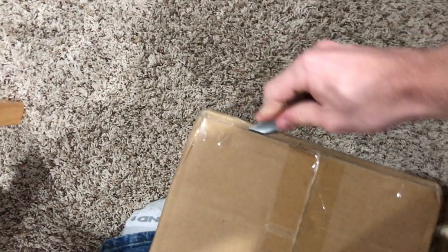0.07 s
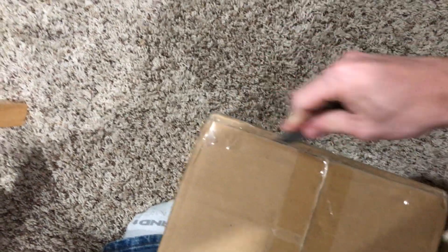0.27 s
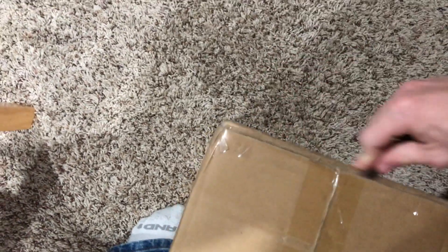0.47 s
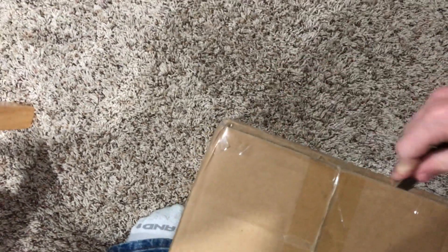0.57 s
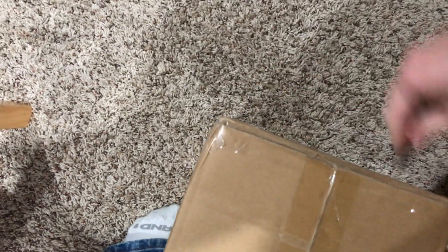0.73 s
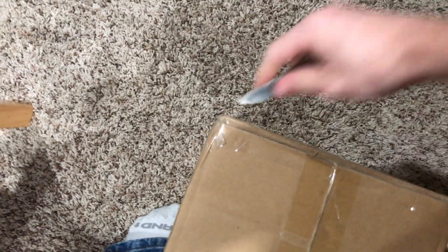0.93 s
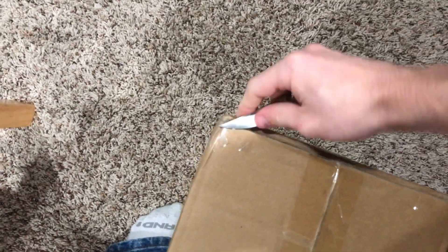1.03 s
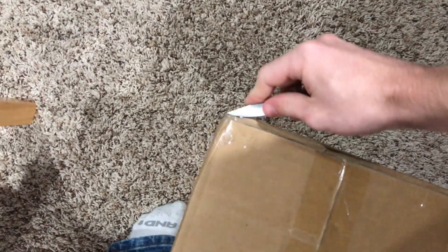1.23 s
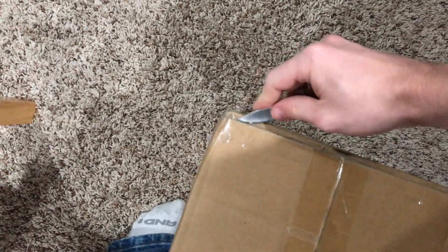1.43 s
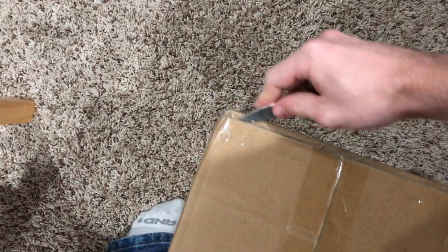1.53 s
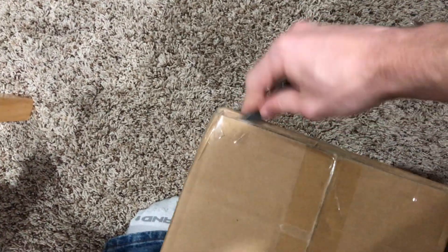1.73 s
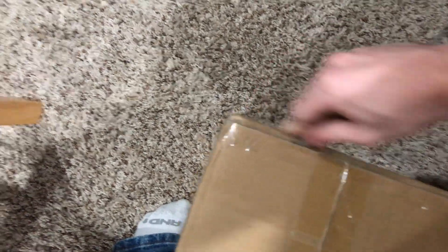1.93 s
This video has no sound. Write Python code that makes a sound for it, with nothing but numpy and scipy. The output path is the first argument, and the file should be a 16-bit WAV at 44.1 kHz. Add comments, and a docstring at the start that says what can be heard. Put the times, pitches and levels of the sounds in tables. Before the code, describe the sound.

A blade scrapes along a taped cardboard box in short rips with crisp snaps and hollow knocks, pauses with only faint ticks, then cuts again; close microphone in a quiet carpeted room.

```python
"""A blade scrapes along the taped seam of a cardboard box in a quiet carpeted room, close to the microphone.
Friction is fine random grit, and each push or knock excites the decaying modes of the hollow box.
Tape fibres rip as dense crackle in short bursts and snap as sharp cracks with a brief ring.
A faint diffuse room tail and a steady room tone lie beneath."""
import sys
import numpy as np
from scipy import signal
from scipy.fft import rfft, irfft
from scipy.io import wavfile

SR = 44100
rng = np.random.default_rng(int(sys.argv[2]) if len(sys.argv) > 2 else 0)


def file_out(sig):
    """Save sig as 16-bit WAV at sys.argv[1]."""
    # one column per channel
    cols = np.atleast_2d(sig).T
    # limit, then scale
    lim = np.clip(cols, -1, 1)
    pcm = np.round(lim * 32767).astype(np.int16)
    wavfile.write(sys.argv[1], SR, pcm)


def gain_from_db(level_db):
    """Turn a decibel level (scalar or array-like) into a linear amplitude factor."""
    decades = np.asarray(level_db, float) / 20
    return 10 ** decades


N = 88200  # samples: 2 s


def evened(x):
    """Energy normalisation: scales a signal to rms 1."""
    return x / np.sqrt(np.mean(x ** 2) + 1e-20)


def add(mix, start_s, sound):
    """Linear superposition: mixes a sound in, cut off at the end of the mix."""
    part = mix[round(start_s * SR):][:len(sound)]
    part += sound[:len(part)]


def coloured(x, spectrum, tilt_db=0.):
    """Spectral shaping: a spectrum table plus a tilt in dB per octave about 4 kHz, at rms 1."""
    hz = np.fft.rfftfreq(len(x), 1 / SR) + 1  # + 1 avoids log(0)
    table_hz, table_db = np.transpose(spectrum)
    gain_db = np.interp(np.log(hz), np.log(table_hz), table_db)
    gain_db = gain_db + tilt_db * np.log2(hz / 4000)
    return evened(irfft(rfft(x) * gain_from_db(gain_db), len(x)))


def band(x, lo_hz, hi_hz):
    """Causal band-pass filtering by a Butterworth response."""
    return signal.sosfilt(signal.butter(2, [lo_hz, hi_hz], "band", fs=SR, output="sos"), x)


def modes(table, t, detune):
    """Modal decay: one exponentially dying sine for each row (hz, level_db, t60_s)."""
    hz, level_db, t60_s = np.transpose(table)[..., None]
    return gain_from_db(level_db - 60 * t / t60_s) * np.sin(2 * np.pi * hz * detune * t)


def crackle(per_s, spread_db):
    """Random impulse process: tiny clicks, a few large, each a puff of noise under a millisecond."""
    clicks = rng.random(N) < per_s / SR
    size = gain_from_db(spread_db * np.minimum(rng.exponential(1, N), 4)) * clicks
    return signal.lfilter([1], [1, -.85], size) * rng.standard_normal(N)


# Blade strokes, one list of breakpoints for each stroke.
# Columns: start_s, scrape_level_db, tilt_db_per_octave (acts only between -3 and 3), drag_level_db.
STROKE_PATHS = [
    [(0, -66.5, -3.5, -99), (0.03, -55, 0.4, -60.5), (0.07, -64, 0.5, -57), (0.12, -52.5, 1, -44.5),
     (0.165, -62.5, -1, -89), (0.2, -63.5, -4, -79), (0.24, -70, -3, -99)],
    [(0.24, -69, -3.5, -72), (0.27, -56.5, 0, -71), (0.295, -54, 14, -52.5), (0.325, -54.5, -1, -50),
     (0.35, -46, -2.5, -52.5), (0.405, -55, 5.5, -55), (0.44, -47.5, -1.3, -40.5),
     (0.5, -50.5, -1.1, -50.5), (0.53, -53.5, 0.5, -62), (0.58, -51, -1.6, -59.5), (0.625, -54, 0.8, -45),
     (0.655, -62, 1.8, -60), (0.69, -66, 3, -72)],
    [(0.69, -73, 15, -82), (0.725, -62.5, -0.5, -76), (0.745, -63, 2, -76), (0.765, -50, 0, -54),
     (0.795, -51, 1, -63), (0.815, -57, -0.5, -74), (0.85, -71.5, 4, -71), (0.92, -85, -3, -87)],
    [(1.06, -82, 2, -85), (1.1, -70, 3, -75), (1.2, -70, 3, -75), (1.26, -84, 2, -85)],
    [(1.782, -61, 3, -58), (1.791, -47, 8.5, -49), (1.82, -55, -0.5, -47), (1.835, -59, 4, -46),
     (1.865, -61.5, 1.5, -66), (1.885, -64.5, 0.5, -61), (1.925, -59, 1.5, -53), (1.95, -49.5, 2.5, -61.5),
     (1.985, -51, 2.5, -46.5), (2, -46.5, -2, -53)],
]


def stroke(column):
    """Piecewise-linear envelope: follows one column of the strokes, silent between them."""
    t, path = np.arange(N) / SR, np.full(N, -100.)  # dB
    for rows in map(np.array, STROKE_PATHS):
        inside = (t >= rows[0, 0]) & (t <= rows[-1, 0])
        path[inside] = np.interp(t[inside], rows[:, 0], rows[:, column])
    return path


# Spectrum of blade friction on card, before tilting; the tape rips share it.
# Columns: frequency_hz, relative_level_db (per Hz).
FRICTION_SPECTRUM = [(180, -35), (300, -6), (361, -26.5), (807, -2), (1290, -7.5), (1580, -3.5), (3360, -2),
                     (4030, -3.5), (4390, -7.5), (5280, -6.5), (14200, -13.5), (15700, -17), (16500, -50)]


def scrape():
    """Sliding friction: many tiny contacts make grit, blended between a dull and a bright colour."""
    grit = crackle(per_s=9000, spread_db=3.)
    bright = np.clip(.5 + stroke(column=2) / 6, 0, 1)
    dull_grit = coloured(grit, FRICTION_SPECTRUM, tilt_db=-3)
    bright_grit = coloured(grit[::-1], FRICTION_SPECTRUM, tilt_db=3)  # reversed: independent grains
    blend = np.sqrt(1 - bright) * dull_grit + np.sqrt(bright) * bright_grit
    return gain_from_db(stroke(column=1)) * blend


# Spectrum of the steady room tone. Columns: frequency_hz, relative_level_db (per Hz).
AIR_SPECTRUM = [(15, -51), (25, -1.5), (108, -2.5), (349, -14.5), (651, -18.5), (1200, -23), (1700, -20.5),
                (2700, -24.5), (4500, -27), (7000, -36), (14000, -31.5), (16500, -48)]


def air():
    """Stationary noise: Gaussian noise shaped into a steady room tone."""
    level_db = -65
    return gain_from_db(level_db) * coloured(rng.standard_normal(N), AIR_SPECTRUM)


# Modes of the box panels and enclosed air, before detuning and extra damping.
# Columns: nominal_hz, relative_level_db, free_t60_s.
BOX_MODES = [(67, -2, 0.28), (124, -1, 0.12), (160.8, -2, 0.13), (225.8, 2.5, 0.083), (244.3, 1, 0.13),
             (571, 1.5, 0.089), (837, 11.5, 0.033), (968, -4, 0.05), (1120, -5, 0.04)]
# Pushes and knocks on the box; peaks before the band-pass.
# Columns: start_s, panel_peak_db, upper_db (against panel), deep_db (against panel).
BOX_KNOCKS = [(0.032, -53, 3, 2), (0.1, -40, 10.5, -1), (0.103, -29.5, -7.5, -10), (0.149, -41, -13, -8),
              (0.302, -55, 8.5, 6), (0.374, -41, -1.5, -8), (0.396, -44.5, -4, -17), (0.415, -29.5, 3, 6),
              (0.427, -41, -1, 3), (0.447, -52, -4, 8), (0.469, -37.5, 2, 8), (0.488, -56.5, -5, 19),
              (0.509, -70, 8, 24), (0.607, -48.5, 0, -13.5), (0.71, -62, 7.5, 4), (0.755, -51, 3.5, 4),
              (0.778, -47.5, -15, 0.5), (0.799, -54.5, 12.5, -12), (1.072, -48, 2.5, -2.5),
              (1.215, -54.5, 4.5, 3), (1.298, -47, -1.5, -14), (1.474, -51.5, -4, 4.5),
              (1.513, -64, -11, 10.5), (1.613, -72, 8, 17), (1.663, -54.5, 0.5, -10), (1.748, -62, 9.5, -2),
              (1.796, -53, -18, 7.5), (1.801, -31, -5, -8), (1.809, -56, 18, -11), (1.839, -56.5, 10, 15),
              (1.862, -53, -16, -10), (1.975, -41.5, -12, -16), (1.988, -48, -14, 9)]


def box():
    """Forced modal resonance: knocks and the drag of the blade excite the same box modes."""
    deep_below_hz, upper_above_hz = 190, 400
    drag_per_s, drag_upper_gain, drag_t60_s = 700, 0.42, 0.02
    contact_s = 0.002
    t, hz = np.arange(9000) / SR, np.array(BOX_MODES)[:, 0]
    deep, upper = hz < deep_below_hz, hz > upper_above_hz
    panel = ~deep & ~upper

    ring = modes(BOX_MODES, t, 0.92)
    response = evened(ring[~upper].sum(0)) + drag_upper_gain * evened(ring[upper].sum(0))
    damped = response * gain_from_db(-60 * t / drag_t60_s)
    drag = evened(signal.fftconvolve(crackle(drag_per_s, 4.2), damped)[:N])
    out = drag * gain_from_db(stroke(column=3))

    push = np.hanning(round(contact_s * SR) + 3)
    for start_s, peak_db, upper_db, deep_db in BOX_KNOCKS:
        # each knock strikes a little differently: pitch and level of every mode vary
        detune = rng.uniform(0.93, 1.02, (len(BOX_MODES), 1))
        ring = modes(BOX_MODES, t, detune) * gain_from_db(3. * rng.standard_normal((len(BOX_MODES), 1)))
        # the upper modes get a contact pulse a third as long
        for group, level_db, contact in ((deep, deep_db, push), (panel, 0, push), (upper, upper_db, push[::3])):
            part = signal.fftconvolve(ring[group].sum(0), contact)
            add(out, start_s, gain_from_db(peak_db + level_db) * part / np.abs(part).max())
    return band(out, 51, 2350)


# Bursts of tearing tape; the tilt is added to the friction spectrum.
# Columns: start_s, length_s (before the fade), level_db, tilt_db_per_octave.
TAPE_RIPS = [(0.097, 0.012, -36.5, 1), (0.132, 0.005, -49, 2), (0.147, 0.0061, -53, 3),
             (0.308, 0.0042, -43, -2), (0.352, 0.014, -50.5, 7.5), (0.388, 0.0042, -38.5, -3),
             (0.416, 0.015, -31, -3), (0.46, .018, -38.5, 1), (0.489, 0.0014, -37.5, -1.5),
             (0.599, 0.02, -48.5, 1.5), (0.633, 0.0074, -49.5, 4.5), (0.707, 0.0087, -54, 3),
             (0.777, 0.00386, -42.5, 1.5), (1.7919, 0.024, -38.5, 2.5), (1.819, 0.0043, -44.5, 4),
             (1.91, 0.005, -45, -1), (1.964, 0.01, -46, 3)]


def rips():
    """Clustered fracture: dense crackle rises fast, holds for the tear and fades exponentially."""
    rise_s, fade_t60_s = 0.00063, 0.012
    out, grit = np.zeros(N), crackle(per_s=15000, spread_db=3.5)
    for start_s, length_s, level_db, tilt_db in TAPE_RIPS:
        first = round(start_s * SR)
        t = np.arange(round(length_s * SR) + 1500) / SR
        shape = np.minimum(t / rise_s, 1) * gain_from_db(-60 * np.maximum(t - length_s, 0) / fade_t60_s)
        tear = coloured(grit[first:][:len(t)], FRICTION_SPECTRUM, tilt_db)
        add(out, start_s, gain_from_db(level_db) * shape[:N - first] * tear)
    return out


# Edges of the low, middle and top treble bands of a snap. Values: edge_hz.
TREBLE_EDGES = (1900, 4500, 9000, 15800)
# Tape snaps and blade ticks.
# Columns: start_s, peak_db, ring_hz, low_treble_db (against middle), top_treble_db (against middle), t60_s.
TAPE_SNAPS = [(0.1066, -15, 4320, -4.5, -7, 0.006), (0.1548, -40, 2420, 6, -14, 0.024),
              (0.305, -20.5, 5900, 0, 3, 0.0093), (0.3116, -21, 4150, -19, 4, 0.011),
              (0.3144, -28, 7140, -20, 8, 0.0099), (0.3355, -20.5, 6430, -35, -11, 0.006),
              (0.3656, -28.5, 2630, -20, -12, 0.023), (0.376, -31, 6850, -26, -11, 0.013),
              (0.38, -24, 2260, 15, 10, 0.013), (0.388, -26, 3220, -9, -1, 0.031),
              (0.392, -18.5, 7100, -26, -24, 0.0087), (0.4139, -16.5, 9750, -22, 10, 0.012),
              (0.4142, -17, 6000, 0, 11, 0.012), (0.42, -14.5, 6460, -10, 0, 0.03),
              (0.4274, -7, 11700, 6.5, 0, 0.0036), (0.4353, -29, 5430, -6, -1, 0.029),
              (0.4491, -15.5, 13750, 7.5, 13, 0.025), (0.4591, -16.5, 9070, -12.5, 2, 0.02),
              (0.47, -24.5, 4060, -3, -18, 0.014), (0.476, -24, 4060, 3, -11, 0.012),
              (0.4855, -21, 4200, -11, -2.5, 0.012), (0.5089, -28, 4360, 13, -17, 0.017),
              (0.6117, -29.5, 3290, 16, 10.5, 0.018), (0.71, -33, 4180, -30, -14, 0.0092),
              (0.7294, -42, 14800, -6, 9, 0.024), (0.762, -43, 2650, -4, 3, 0.041),
              (0.7826, -23.5, 13600, -18, 7, 0.0058), (0.7873, -32, 13900, -6, 6, 0.023),
              (0.8001, -18, 2260, 10.5, 6, 0.017), (1.07, -41, 3250, 14, -28, 0.066),
              (1.1128, -44.5, 9900, 11, 14, 0.022), (1.132, -46.5, 6700, 5.5, 5, 0.012),
              (1.141, -51, 5400, 6, 2, 0.02), (1.321, -57, 5600, -15, -8, 0.0097),
              (1.2126, -46.5, 3050, 16.5, 1.5, 0.045), (1.295, -41, 5520, 3.5, 1, 0.018),
              (1.4855, -44, 3800, -2.5, -3, 0.077), (1.5159, -26.5, 6440, -10.5, -26, 0.014),
              (1.609, -50, 5880, 5, 5, 0.12), (1.746, -28.5, 12500, -8.5, -8.5, 0.016),
              (1.7997, -44, 3140, -14, -19, 0.024), (1.8296, -50, 9300, 14, -8, 0.014),
              (1.8383, -35.5, 4200, 1, -2, 0.041), (1.8412, -40, 3000, 5, -10, 0.024),
              (1.8906, -32.5, 2940, -2, -17, 0.0086), (1.895, -37.5, 3120, 16, -19, 0.02),
              (1.899, -34.5, 2180, -1, -21, 0.032), (1.905, -32, 2700, -5, -14, 0.074),
              (1.911, -36, 2120, 12, -15, 0.021), (1.9378, -34, 4150, -11, 2, 0.035)]


def snaps():
    """Impulsive release: a faint start, a sharp crack with sizzle, and a short ring of the taut strip."""
    delay_s, crack_gain = .0005, 4.5  # the faint start leads the crack by delay_s
    ring_share, ring_cycles = .34, 22  # the ring falls 60 dB in ring_cycles
    out, t = np.zeros(N), np.arange(2000) / SR - delay_s
    for start_s, peak_db, ring_hz, low_db, top_db, t60_s in TAPE_SNAPS:
        noise = rng.standard_normal(len(t))
        crack = noise * np.where(t < 0, .12, gain_from_db(-60 * np.abs(t) / max(t60_s, .003)))
        crack[round(delay_s * SR)] = crack_gain * np.sign(noise[0])
        gains = (-gain_from_db(low_db), 1, -gain_from_db(top_db))  # outer bands in opposite polarity
        bands = zip(gains, TREBLE_EDGES, TREBLE_EDGES[1:])
        crack = sum(gain * evened(band(crack, lo, hi)) for gain, lo, hi in bands)
        ring = modes([(ring_hz, 0, ring_cycles / ring_hz)], np.maximum(t, 0), 1)[0]
        snap = (1 - ring_share) * evened(crack) + ring_share * evened(ring)
        add(out, start_s - delay_s, gain_from_db(peak_db) * snap / np.abs(snap).max())
    return out


def room(x):
    """Diffuse reverberation: convolution with a short dull tail of random reflections."""
    t60_s, first_reflection_s = 0.5, .003
    t = np.arange(SR // 2) / SR
    reflections = rng.standard_normal(len(t)) * gain_from_db(-60 * t / t60_s) * (t > first_reflection_s)
    tail = band(reflections, 47, 9000)
    return signal.fftconvolve(x, tail / np.linalg.norm(tail))[:N]


def scene():
    """Superposition of the near sources, their room tail and the room tone."""
    room_db = -24
    near = scrape() + box() + rips() + snaps()
    return (near + gain_from_db(room_db) * room(near) + air())[None]


def low_pass(x):
    """Removes everything above the highest recorded frequency."""
    return signal.sosfilt(signal.butter(12, 16900, fs=SR, output="sos"), x)


def record(dry):
    """Linear microphone response: cuts the lowest bass and dips in the high treble."""
    low_hz, dip_hz, dip_q, dip_share = 50, 10260, 4.4, 0.51
    x = signal.sosfilt(signal.butter(3, low_hz, "high", fs=SR, output="sos"), dry)
    mix = x - dip_share * signal.lfilter(*signal.iirpeak(dip_hz, dip_q, SR), x)
    return low_pass(mix)


dry = scene()
out = record(dry)
file_out(out)
```